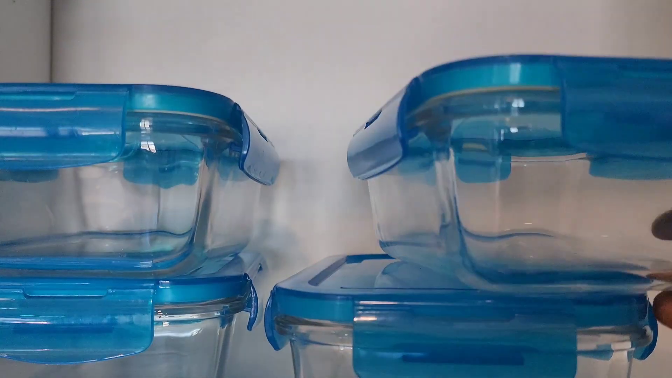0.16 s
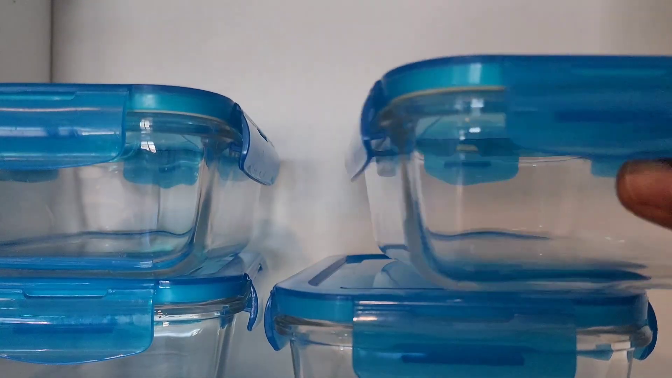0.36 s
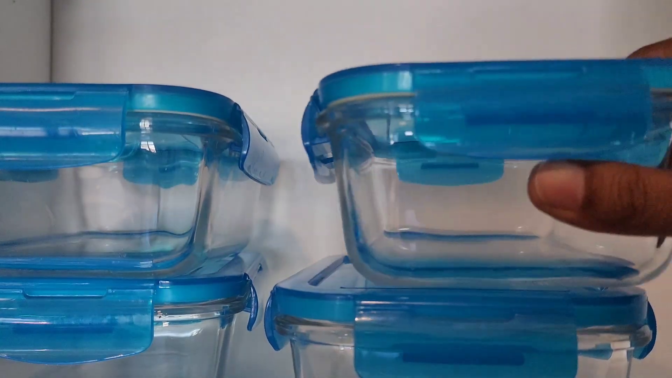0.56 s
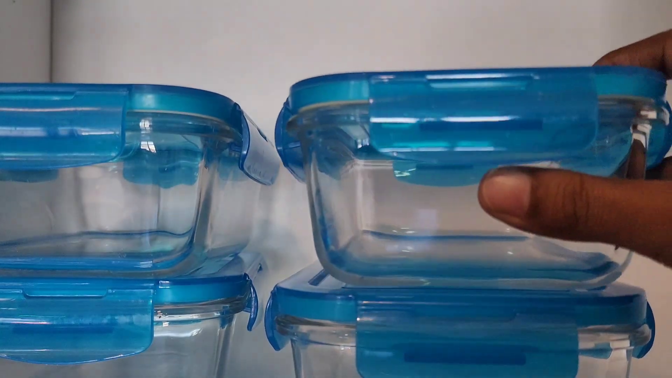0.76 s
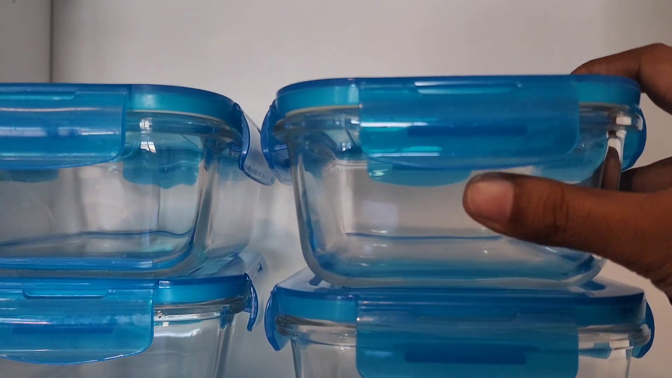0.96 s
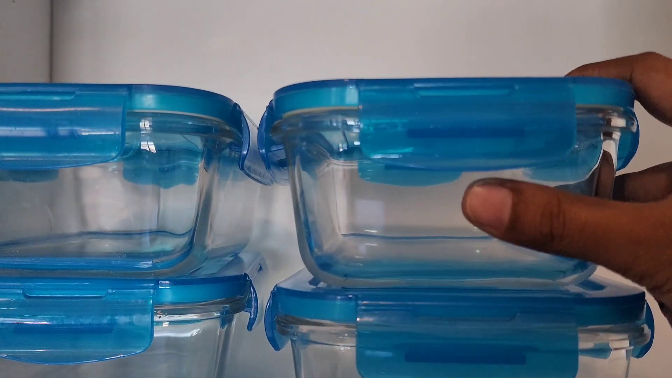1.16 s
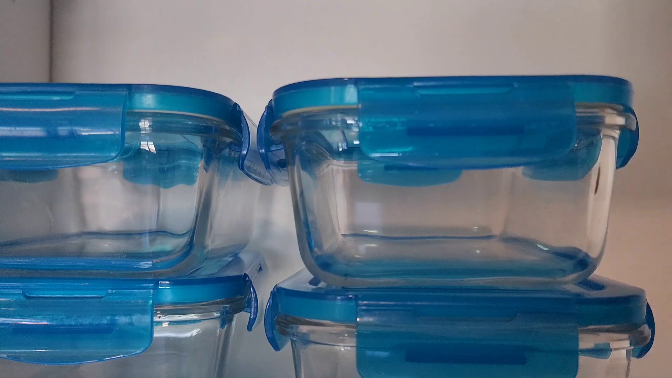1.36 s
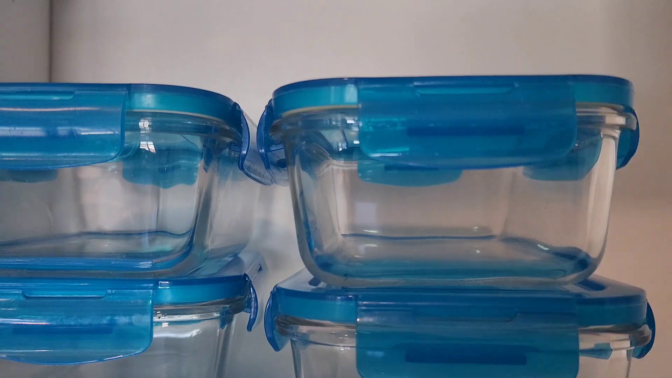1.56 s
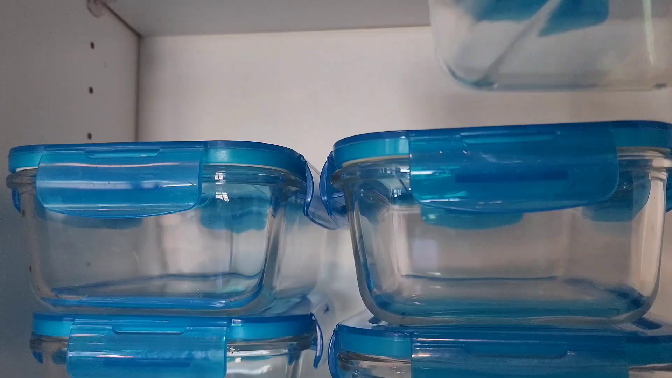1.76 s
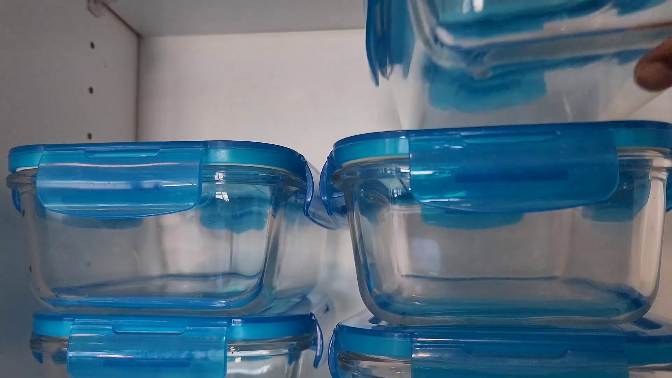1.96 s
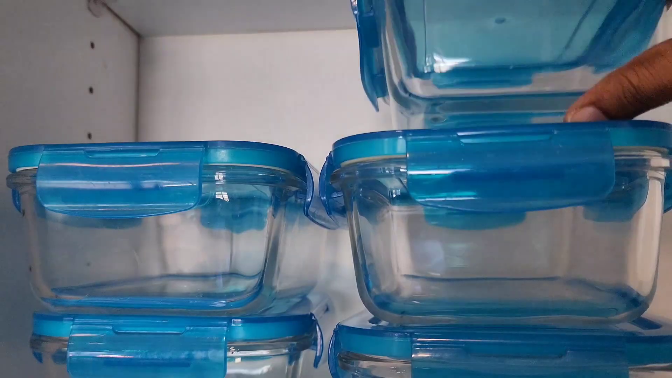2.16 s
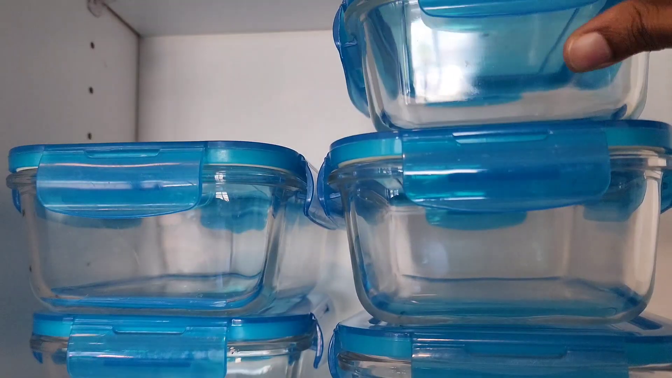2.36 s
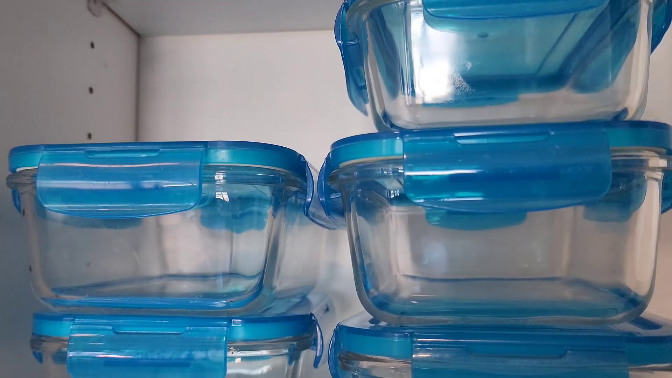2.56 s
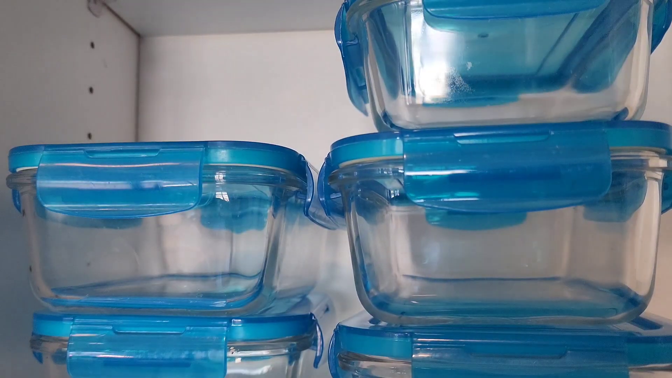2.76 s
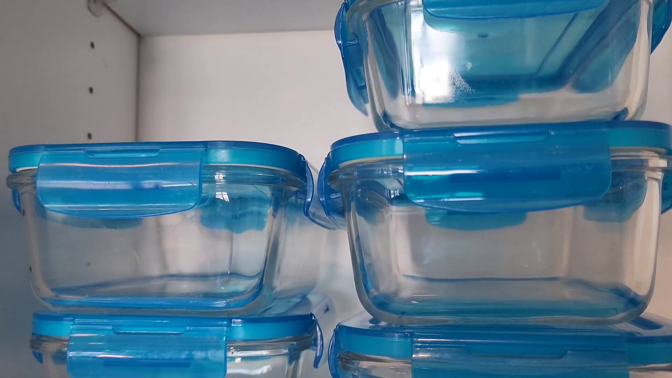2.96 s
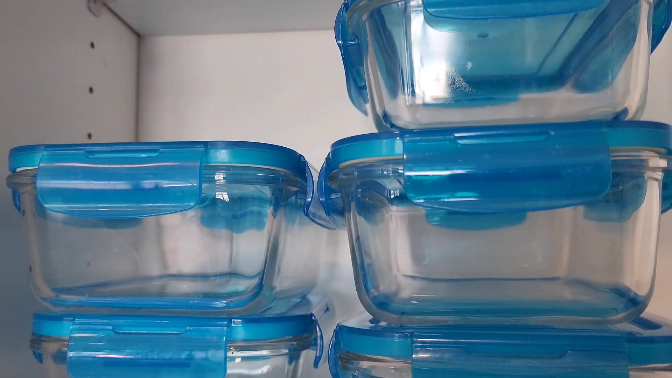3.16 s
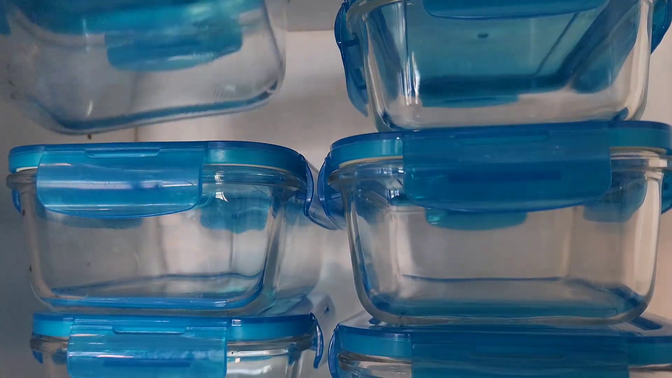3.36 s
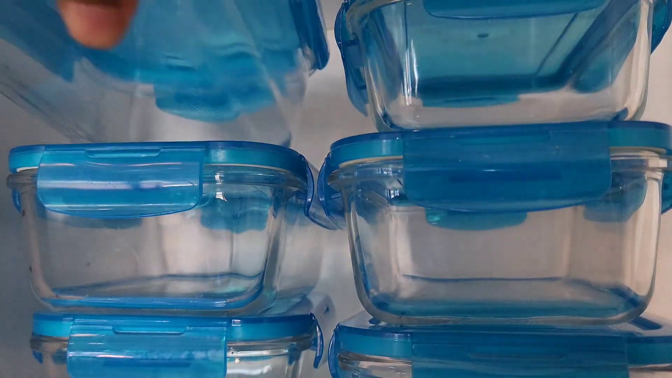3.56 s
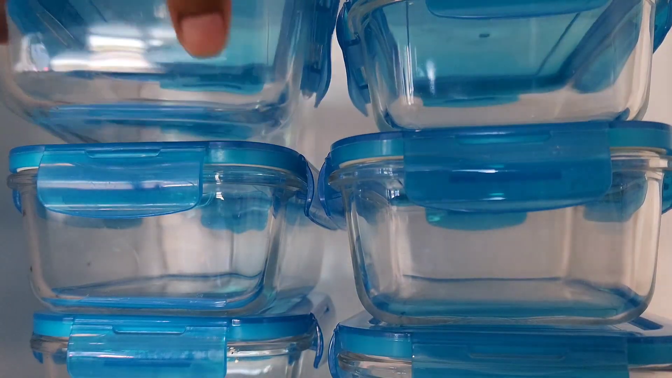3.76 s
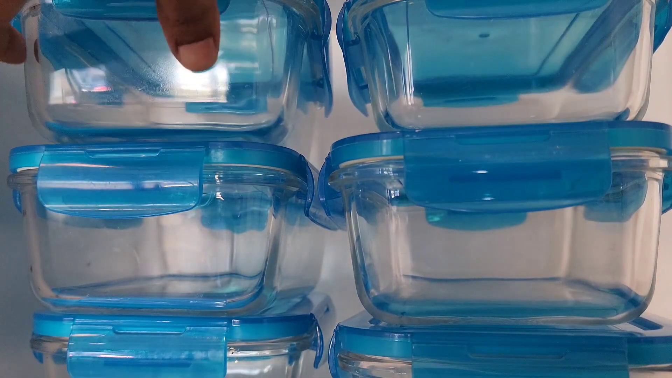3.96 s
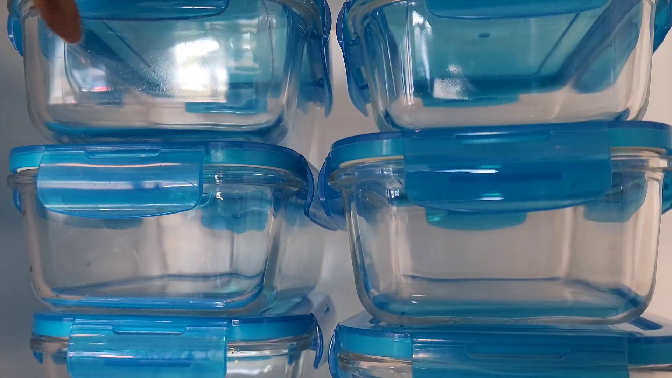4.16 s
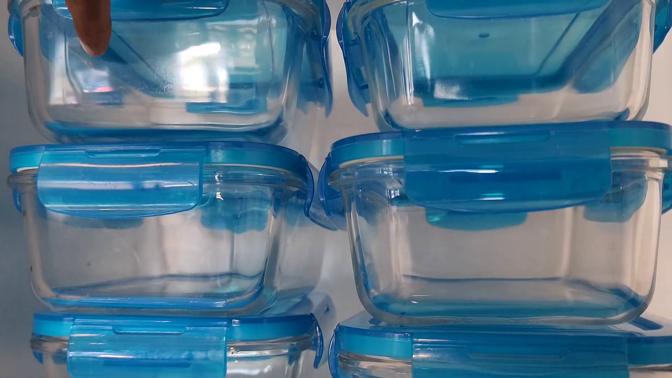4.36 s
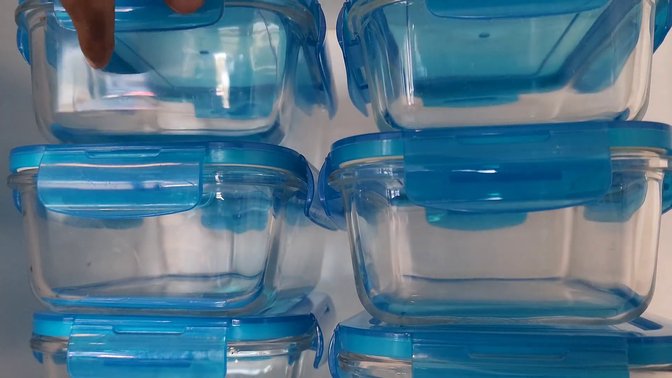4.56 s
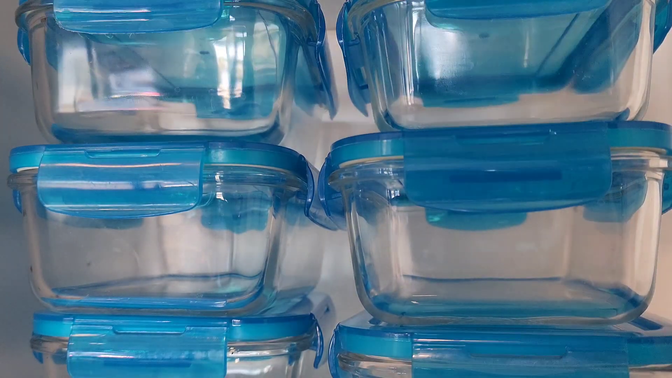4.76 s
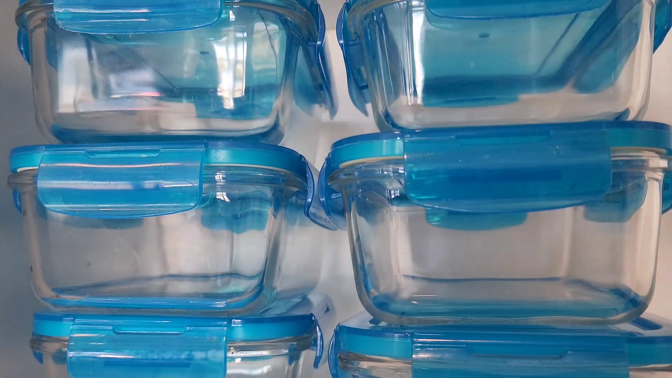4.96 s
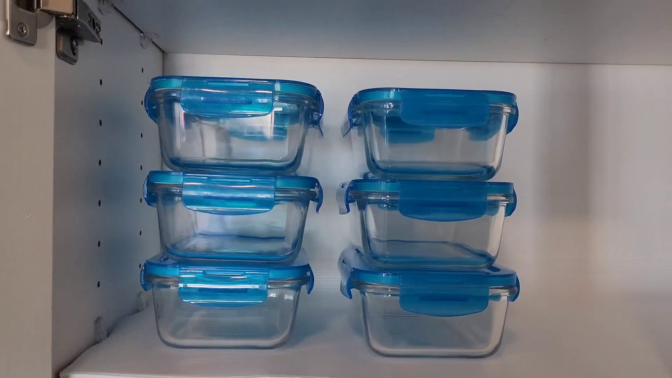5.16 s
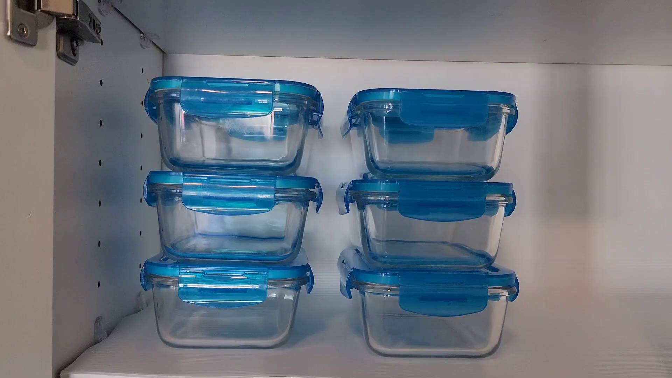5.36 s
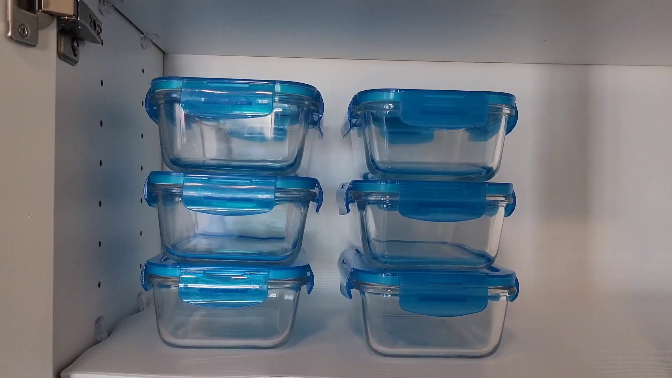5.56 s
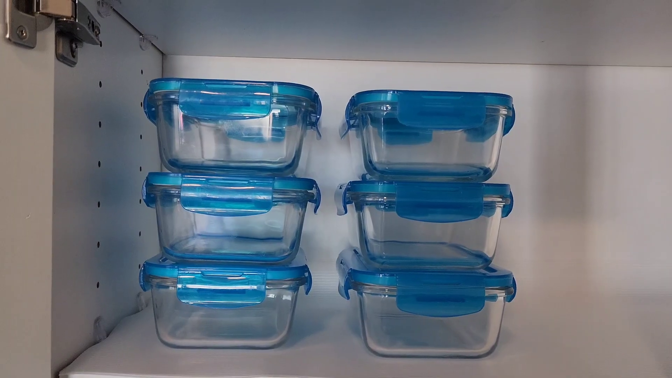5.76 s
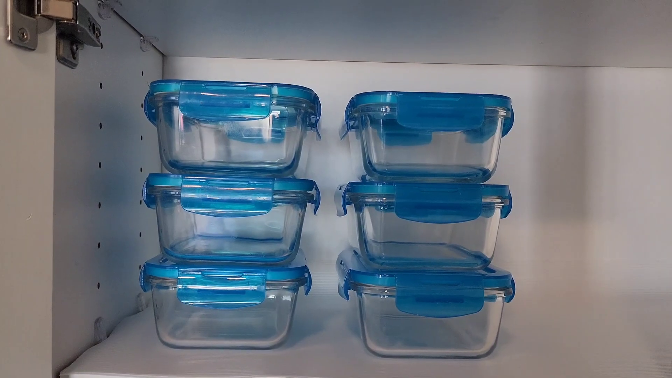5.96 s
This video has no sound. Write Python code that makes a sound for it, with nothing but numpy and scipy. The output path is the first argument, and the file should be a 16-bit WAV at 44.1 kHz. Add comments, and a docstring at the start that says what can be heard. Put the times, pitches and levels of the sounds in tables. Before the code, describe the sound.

Glass containers with plastic lids knock and clink as they are stacked in a kitchen cabinet, over a faint refrigerator hum.

```python
"""Glass boxes with plastic lids are set down and stacked in a kitchen cabinet, close to a phone.
Each contact is a short chatter that cracks, rings glass, rim and lid and thumps shelf and walls;
the cabinet reverberates. Fingers brush the lids and one drags on the glass. A refrigerator hums
over quiet room air. Near the end a faint double click marks a cut; hiss and whine change abruptly."""
import sys
import numpy as np
from scipy import signal
from scipy.fft import rfft, irfft, next_fast_len
from scipy.io import wavfile
from scipy.ndimage import map_coordinates

SR = 44100
rng = np.random.default_rng(int(sys.argv[2]) if len(sys.argv) > 2 else 0)


def transcribe(u):
    """Save the signal u as a 16-bit wav file named by the first command-line argument.

    u: samples, shape (n,) or (channels, n), limited to [-1, 1]; the rate is SR.
    q: integer samples, one column per channel.
    """
    v = np.clip(np.atleast_2d(u).T, -1, 1)
    q = np.round(v * 32767).astype(np.int16)
    wavfile.write(sys.argv[1], SR, q)


N = 265482
TIME_S = np.arange(N) / SR
CUT_S = 5.065  # hiss and whine change abruptly


def amp(db):
    """Level in dB to gain."""
    return 10 ** (np.asarray(db) / 20)


def along(points, hz):
    """(f/Hz, value) points interpolated on a log axis."""
    f, values = np.transpose(points)
    return np.interp(np.log(hz + 1), np.log(f + 1), values)


def curves(rows):
    """(t/s, ...) rows to one per-sample curve per value column."""
    times, *columns = np.transpose(rows)
    return [np.interp(TIME_S, times, column) for column in columns]


def wobble(rate_hz):
    """Smooth random curve through knots at rate_hz."""
    knots = rng.standard_normal(int(N * rate_hz / SR) + 4)
    return map_coordinates(knots, [TIME_S * rate_hz])


def stroke(start_s, hold_s, db, rise_s, fall_s):
    """Gain that rises, holds and falls; rise_s and fall_s per 10 dB."""
    since = TIME_S - start_s
    return amp(db - 10 * np.maximum(-since / rise_s, 0) - 10 * np.maximum((since - hold_s) / fall_s, 0))


def filtered(x, response):
    """x through a complex frequency response."""
    n = x.shape[-1]
    padded = next_fast_len(n + 2048)
    return irfft(rfft(x, padded) * response(np.fft.rfftfreq(padded, 1 / SR)), padded)[..., :n]


def shaped(x, gains):
    """x through a (f/Hz, gain/dB) curve."""
    return filtered(x, lambda hz: amp(along(gains, hz)))


def peaked(drive, response):
    """Filtered rows, scaled so the first peaks at 1."""
    answer = filtered(drive, response)
    return answer / np.abs(answer[0]).max()


def paired(pair, coherence):
    """Two independent signals mixed to a (f/Hz, left-right coherence) curve, clipped to +-1."""
    def weights(hz):
        angle = np.arccos(np.clip(along(coherence, hz), -1, 1)) / 2
        return np.array([np.cos(angle), np.sin(angle)])
    mid, side = filtered(pair, weights)
    return np.array([mid + side, mid - side])


def noise(spectrum, coherence):
    """Shaped stereo noise, rms 1."""
    x = paired(shaped(rng.standard_normal((2, N)), spectrum), coherence)
    return x / np.sqrt(np.mean(x ** 2))


def echoes(x, tail):
    """x convolved with a stereo tail, left energy scaled to 1."""
    return signal.fftconvolve(x[None], tail / np.linalg.norm(tail[0]), axes=1)[:, :len(x)]


# room air: t/s, murmur level/dB, hiss level/dB
AIR_LEVELS = [(0, -60, -82.5), (1.6, -58, -78.5), (4.1, -56, -75.5), (4.6, -57, -77.5), (5.05, -57, -77),
              (6.02, -58, -76.5)]
# air spectra: f/Hz, relative density/dB
MURMUR_SPECTRUM = [(12, -28.5), (30, -2), (85, -4), (105, -8.5), (160, -15), (200, -7), (290, -11.5),
                   (325, -19), (400, -12.5), (600, -19), (950, -24.5), (1250, -24), (1450, -29),
                   (2500, -53.5), (4000, -77)]
HISS_SPECTRUM = [(1060, -41.5), (1800, -8), (3220, -15.5), (3310, -8), (3560, -7), (3730, -12.5),
                 (3840, -14.5), (4370, -14), (5210, -19), (7600, -12.5), (9490, -18), (15200, -26.5),
                 (16400, -31)]
# murmur width: f/Hz, coherence
MURMUR_COHERENCE = [(60, 1.0), (180, 0.83), (550, 0.42), (1650, -0.21), (4970, 0.82), (15000, -2)]
# hiss dulling after the cut: f/Hz, gain/dB
DULL_HISS_EQ = [(7000, -0.2), (9500, -12), (16000, 1)]
def air():
    """Low room murmur under a faint hiss, duller after the cut."""
    murmur_db, hiss_db = curves(AIR_LEVELS)
    murmur = amp(murmur_db + .8 * wobble(3.22)) * noise(MURMUR_SPECTRUM, MURMUR_COHERENCE)
    hiss = noise(HISS_SPECTRUM, [(3000, 0)])
    hiss = np.where(TIME_S < CUT_S, hiss, shaped(hiss, DULL_HISS_EQ))
    return murmur + amp(hiss_db + .8 * wobble(1.8)) * hiss


# motor hum: f/Hz, level/dB
MOTOR_LINES = [(59.2, -52), (118.4, -62.5), (215.3, -75), (296.1, -70), (371.4, -81), (414.5, -77.5),
               (624.5, -84)]
# thin tones: f/Hz, level before the cut/dB, level after/dB
WHINE_LINES = [(1066, -88, -85), (1125, -88, -78), (3440, -89, -87), (3618, -104, -87)]
def refrigerator():
    """Motor lines, the higher the less steady; the whine swells with the hiss until the cut."""
    _, hiss_db = curves(AIR_LEVELS)
    swell_db = .7 * (hiss_db - hiss_db.mean())
    whine = [(hz, np.where(TIME_S < CUT_S, before + swell_db, after))
             for hz, before, after in WHINE_LINES]
    hum = np.zeros((2, N))
    for hz, db in list(MOTOR_LINES) + whine:
        unsteady = np.log(hz / 45)
        phase = 2 * np.pi * hz * TIME_S + 0.28 * unsteady * wobble(25)
        spread_rad = min(hz / 900, .8) * rng.uniform(-1, 1)
        flicker_db = 0.3 * unsteady * wobble(8.3) + 0.52 * wobble(2.73)
        hum += amp(db + 3.5 + flicker_db) * np.sin([phase + spread_rad, phase - spread_rad])
    return hum


def ring(modes, drive, scatter_db):
    """Driven resonances of alternating sign, their strengths redrawn for each blow."""
    gains = [(-1) ** k * amp(db + rng.normal(0, scatter_db)) for k, (_, _, db) in enumerate(modes)]
    return peaked(drive, lambda hz: sum(gain * 1j * hz * width / (centre ** 2 - hz ** 2 + 1j * hz * width)
                                        for gain, (centre, width, _) in zip(gains, modes)))


def favoured(modes, hz, db_per_octave=10):
    """Modes weakened by their distance from hz."""
    return [(centre, width, db - db_per_octave * abs(np.log2(centre / hz))) for centre, width, db in modes]


# contacts: t/s, level/dB, relative wall boom/dB, shelf thump/dB, lid knock/dB, rim clink/dB,
# chatter time constant/ms
CONTACTS = [(0.0014, -25.5, 4, 8.5, 3, -19.5, 29.7), (0.0204, -35, 3.5, 9.5, 6, -12, 30),
            (0.1227, -19, -7, -2.5, -12, -20.5, 1.2), (0.1396, -26, -3, -6.5, -10, -29, 1.5),
            (0.206, -49, 5, 14.5, 9, -3.5, 7.1), (0.2423, -59.5, 11, 1, 6, -19, 1.3),
            (0.4741, -45, 12.5, 11, 0.5, -29, 7), (0.6538, -47.5, 5, 1.5, -21, -33.5, 1.34),
            (1.2531, -56.5, 15, -10, -2, 11, 5.6), (1.258, -49, 17.5, 13.5, 10, -18, 2.6),
            (1.3347, -69.5, 30.5, 23, 9.5, -16, 1.6), (1.709, -57, 12, -2, -11, -15, 0.87),
            (1.721, -59.5, 5, 2, -2, -16, 1.3), (1.7987, -52, 5, 10.5, -1.5, 1, 9.6),
            (1.875, -59.5, 2, 9, -2, -1, 12), (1.982, -20.5, -29.5, 5.5, 2.5, -4, 0.69),
            (1.9862, -26.5, 2.5, 8, -8, -29.5, 2.2), (2.012, -42, 4, 15.5, 0, -4, 2.2),
            (2.0319, -45.5, 14.5, 15, 10.5, -27.5, 2), (2.0973, -15.5, -7, -1.5, -10.5, -13.5, 3.3),
            (2.1048, -34, 8, 7, 1.5, -1.5, 3.5), (2.1145, -35.5, -1.5, 15.5, 5.5, -22.5, 14),
            (2.1289, -41.5, -5, 14, 10, -25, 3), (2.1592, -41, 13.5, 11.5, 6.5, -15.5, 1.2),
            (2.23, -23.5, 5.5, -2, -7, -17.5, 10), (2.2406, -22, -1, 5, -5, -10.5, 14.7),
            (2.2534, -36.5, 0, 6.5, -4, -20.5, 26), (2.4149, -57.5, 20, 17, 8, -22, 2.8),
            (2.47, -59.5, 16.5, 6, 8.7, 5, 2), (2.5065, -49.5, 13, 5, 9.5, -47.5, 2.6),
            (2.5704, -51, 11, 7.5, -4.5, -37, 2.1), (3.2514, -51.5, -4, 1.5, -6.5, -12, 1.3),
            (3.4081, -29, 7.5, 12, 4, -1, 1.8), (3.4141, -42, 14, 15, 20.5, -2.5, 3.7),
            (3.5271, -23.5, -2.5, 2, 2.5, -4.5, 1.7), (3.5494, -38, 3, 19, 4, -27, 4.8),
            (3.5775, -46, 5, 14, 1, -18, 1.9), (3.5971, -55, 19, -10, 11, -23, 1.4),
            (3.682, -26.5, 8.5, 18, 6.5, -17, 10), (3.6887, -16.5, -2.5, 1.5, -21, -16, 5.1),
            (3.7234, -25.5, 1.5, 10, -0.5, -1.5, 3.9), (3.7302, -29.5, -4, 19.5, 7, -9.5, 1.5),
            (3.7444, -35, 8, 10, -11, -9, 4.6), (3.7753, -50, 18.5, -6, 9.5, -17.5, 3),
            (3.8333, -37, 14, 15, 7, -24.5, 1.8), (3.8403, -30.5, 1.5, 4.5, -6, -32.5, 11),
            (3.859, -48, 17, 19, -4, -17.5, 3.3), (4.2438, -70, 5, 16, 17, -22, 11)]
# handlings: from t/s, favoured lid f/Hz, favoured rim f/Hz, sparkle re clink/dB
HANDLINGS = [(0, 650, 4300, 3), (.3, 710, 4300, -20), (1.1, 640, 5600, -17), (1.6, 600, 4300, 2.5),
             (2.95, 720, 6760, 5)]
# body modes: f/Hz, width/Hz, relative level/dB
GLASS_MODES = [(1340, 510, 19.5), (1910, 290, -22), (2148, 600, 11), (2550, 140, -36.5), (3220, 450, -5.5)]  # damped by lid and hand
RIM_MODES = [(4340, 190, -1), (5644, 600, 6.5), (6240, 950, 5), (7410, 2150, 11)]  # stiff rim and clasps
LID_MODES = [(570, 177, 2.5), (600, 25, 5.5), (667, 53, -10), (777.6, 49.5, 3), (873, 180, -10),
             (1152, 250, -9.5), (1184, 170, -2.5)]
SHELF_MODES = [(249, 46.4, -2), (281.6, 49.5, 0), (309, 89, -5.5), (419.5, 32.5, -2.5), (477.6, 53, -10)]
WALL_MODES = [(55, 10, -4), (85, 20, -3.5), (125, 29, 0.5), (160.3, 11, 7)]
# shelf to the left, clinks slightly right: f/Hz, left minus right/dB
BALANCE = [(150, -0.3), (320, 4.5), (800, -0.9), (2500, -0.2), (8000, -1)]
LEFT_STACK_S = 3.0  # later boxes go onto the left stack
def boxes():
    """Glass meets lid in a chatter that cracks and rings; the weight drives shelf and walls."""
    out = np.zeros((2, N + SR))
    t = np.arange(SR * 3 // 10) / SR
    for start_s, db, boom_db, thump_db, knock_db, clink_db, chatter_ms in CONTACTS:
        _, lid_hz, rim_hz, sparkle_db = [row for row in HANDLINGS if row[0] <= start_s][-1]
        chatter = rng.standard_normal(len(t)) * np.exp(-1000 * t / chatter_ms)
        chatter *= amp(3 * rng.standard_normal(len(t) // 32 + 1)).repeat(32)[:len(t)]  # uneven bounces
        # row 0: direct sound; row 1: one jolt of equal energy, feeding the echoes
        jolts = np.array([chatter, np.linalg.norm(chatter) * (t == 0)])
        push = np.exp(-t / 0.00075) * t / 0.00032 + 0.04 * jolts  # the weight lands softly
        crack = amp(-16) * peaked(jolts, lambda hz: 1j * hz / (1300 + 1j * hz) / (1 + 1j * hz / 4500) ** 4)
        glass = amp(-5) * ring(GLASS_MODES, jolts, scatter_db=3)
        clink = amp(clink_db) * ring(favoured(RIM_MODES, rim_hz), jolts, scatter_db=1.5)
        sparkle = amp(clink_db + sparkle_db) * peaked(jolts, lambda hz: (1j * hz / (8000 + 1j * hz)) ** 4)
        knock = amp(knock_db) * ring(favoured(LID_MODES, lid_hz), jolts, scatter_db=2)
        thump = amp(thump_db) * ring(SHELF_MODES, push, scatter_db=2)
        boom = amp(boom_db) * ring(WALL_MODES, push, scatter_db=1.22)
        blow = crack + glass + clink + sparkle + knock + thump
        left_lag_s = -.00022 if start_s > LEFT_STACK_S else .0001
        direct = filtered(blow[0], lambda hz: np.exp(1j * np.pi * left_lag_s * np.outer([-1, 1], hz)))
        direct += boom[0]  # long waves reach both microphones alike
        onset = round(start_s * SR)
        out[:, onset:onset + len(t)] += amp(db - 3) * (direct + cabinet(blow[1] + boom[1]))
    return filtered(out[:, :N], lambda hz: amp(np.outer([.5, -.5], along(BALANCE, hz))))


# cabinet decay: f/Hz, T60/s
CABINET_T60 = [(80, 0.24), (210, 0.43), (560, 0.34), (1500, 0.3), (4000, 0.39), (12000, 0.4)]
# echo width: f/Hz, coherence
CABINET_COHERENCE = [(60, 1), (180, 0.92), (550, 0.32), (1650, 0.03), (4970, 0.031), (15000, 0.061)]
# tail strength: f/Hz, gain/dB
TAIL_EQ = [(80, 4), (300, -10), (1000, 3), (3000, -7.5), (8000, -6), (14000, 0)]
def cabinet(x, early_t60_s=0.04, tail_rise_s=0.00087):
    """Nearby boxes reflect short waves at once; in the tail each frequency decays at its own rate."""
    t = np.arange(len(x)) / SR
    early = paired(rng.standard_normal((2, len(x))) * amp(-60 * t / early_t60_s), CABINET_COHERENCE)
    hz, frame_s, spectra = signal.stft(rng.standard_normal((2, len(x))), SR, nperseg=256)
    decay = amp(-60 * frame_s / along(CABINET_T60, hz)[:, None])
    tail = signal.istft(spectra * decay, SR, nperseg=256)[1][:, :len(x)]
    tail = paired(tail * (1 - np.exp(-t / tail_rise_s)), CABINET_COHERENCE)
    highs = filtered(x, lambda f: 1j * f / (500 + 1j * f))
    return amp(5) * echoes(highs, early) + echoes(shaped(x, TAIL_EQ), tail)


# finger slides: t/s, hold/s, rustle level/dB, fizz level/dB
SLIDES = [(0.318, 0.003, -114.5, -79.5), (0.348, 0.013, -73, -73.5), (0.597, 0.004, -90, -78),
          (1.232, 0.004, -72, -73), (1.394, 0.04, -83, -80), (2.435, 0.04, -71, -88),
          (2.79, 0.0064, -67, -70), (2.86, 0.41, -87.5, -96), (2.932, 0.042, -74, -76),
          (3.011, 0.019, -68.5, -65), (3.093, 0.051, -78.5, -75.5), (3.221, 0.03, -76, -74),
          (3.31, 0.1, -81, -81), (4.064, 0.011, -71, -77), (4.122, 0.077, -65, -71),
          (4.22, 0.16, -79.5, -96), (4.48, 0.05, -77, -82), (4.648, 0.012, -75, -70)]
# skin on plastic: f/Hz, relative density/dB
RUSTLE_SPECTRUM = [(1760, -50), (3000, -3), (3260, -1), (3920, -4), (6490, 4.5), (9000, -3), (11700, -43),
                   (19800, -120)]
def fingers():
    """Skin slips over the lids: grainy rustle, fizz above; longer slides have softer edges."""
    grain = amp(2.2 * wobble(90))
    envelopes = np.array([stroke(start_s, hold_s, 0, 0.004 + 0.13 * hold_s, 0.014 + 0.13 * hold_s)
                          for start_s, hold_s, _, _ in SLIDES])
    _, _, rustle_db, fizz_db = np.transpose(SLIDES)
    rustle = amp(rustle_db) @ envelopes * noise(RUSTLE_SPECTRUM, [(3000, 0.074)])
    fizz_spectrum = [(6000, -60), (8500, 3), (12000, -1.5), (16400, -8)]
    fizz = amp(fizz_db) @ envelopes * noise(fizz_spectrum, [(3000, 0.19)])
    return grain * (rustle + fizz)


# fingertip on glass: t/s, hold/s, level/dB
DRAG = (4.17, 0.042, -63.5)
def fingertip_drag():
    """A fingertip drags on the glass and sings in a noise band near 2.8 kHz."""
    band = noise([(2300, -18), (2800, -4), (3200, -7), (4200, -19), (6000, -36)], [(3000, .3)])
    return stroke(*DRAG, rise_s=.035, fall_s=.06) * band


def splice_clicks(db=-48, gap_s=.0045, decay_s=.0004):
    """Two dry broadband clicks at the cut."""
    jumps = np.zeros(N)
    jumps[[round(CUT_S * SR), round((CUT_S + gap_s) * SR)]] = -1, 1
    pulse = np.exp(-TIME_S[:SR // 100] / decay_s)
    return amp(db) * np.convolve(jumps, pulse)[:N]


def scene():
    """Handling sounds and splice clicks over refrigerator and room air, stereo."""
    return boxes() + fingers() + fingertip_drag() + splice_clicks() + refrigerator() + air()


# microphone response: f/Hz, gain/dB
MICROPHONE_EQ = [(6000, 2), (8500, 0.5), (10000, -7), (11500, 0), (15300, 2), (16000, -17.5)]
BAND_LIMIT_HZ = 16500
def record(dry):
    """The microphones dip near 10 kHz and pass nothing above the band limit."""
    return filtered(dry, lambda hz: amp(along(MICROPHONE_EQ, hz)) * (hz < BAND_LIMIT_HZ))


dry = scene()
out = record(dry)
transcribe(out)
```